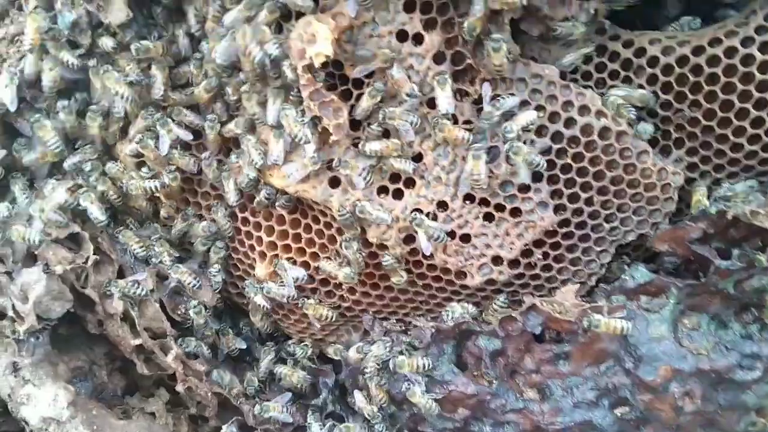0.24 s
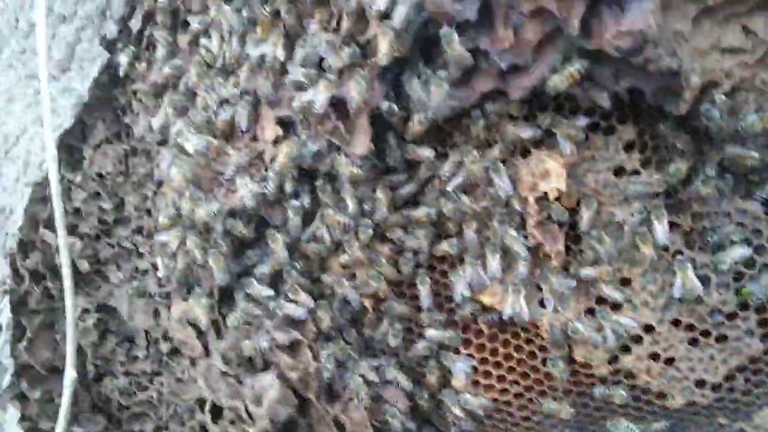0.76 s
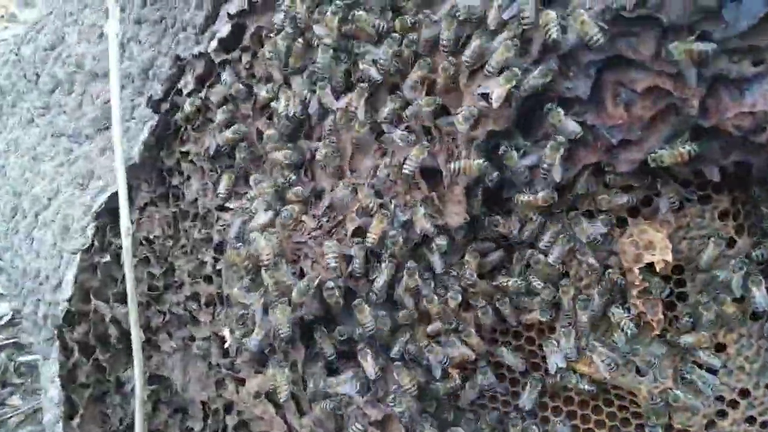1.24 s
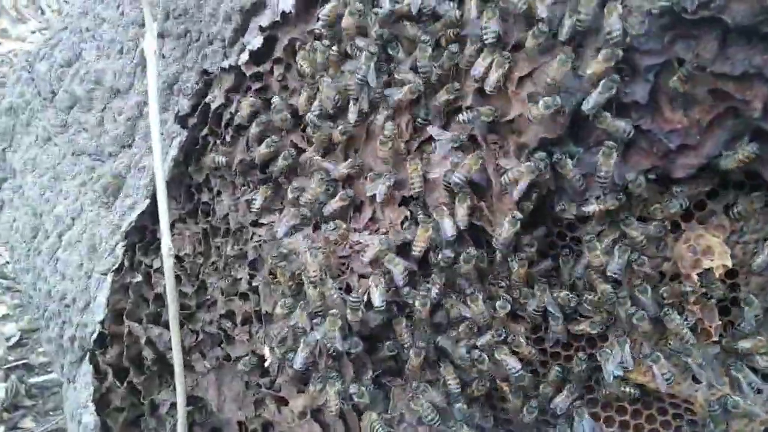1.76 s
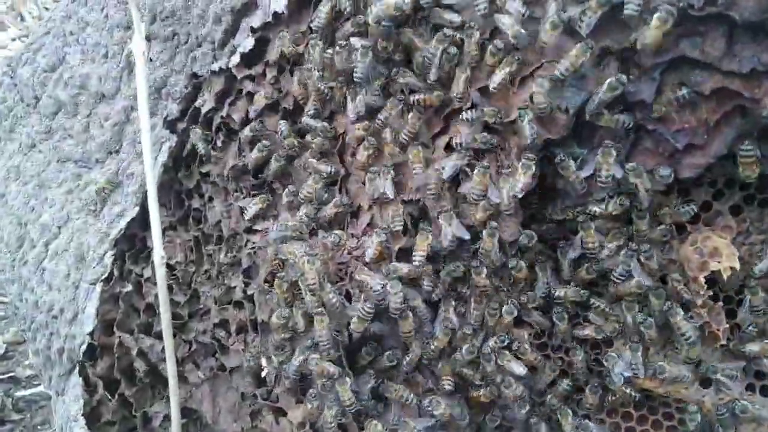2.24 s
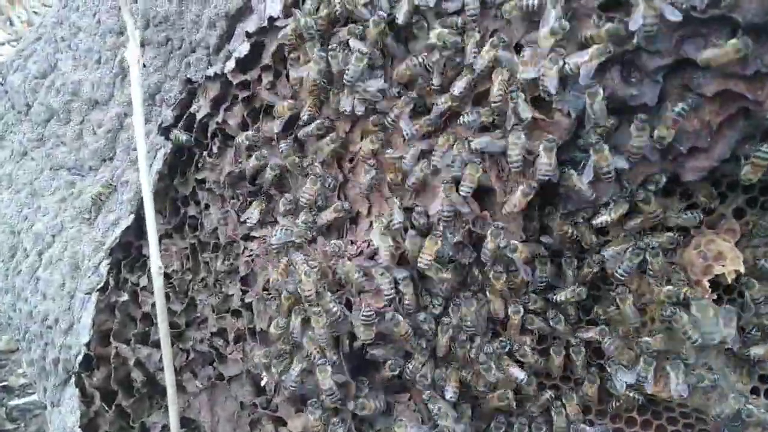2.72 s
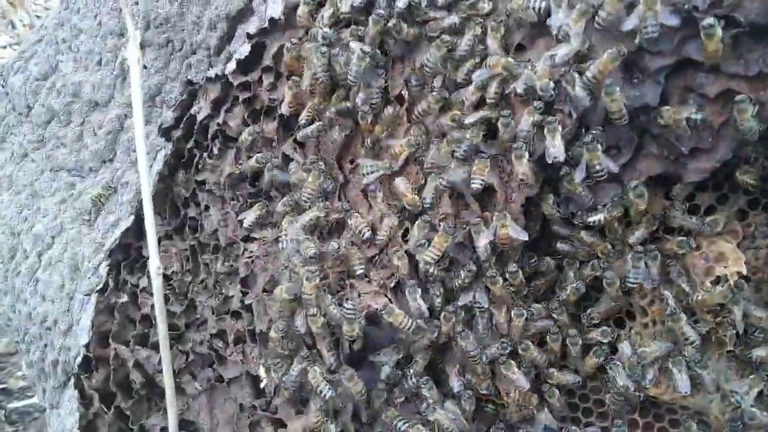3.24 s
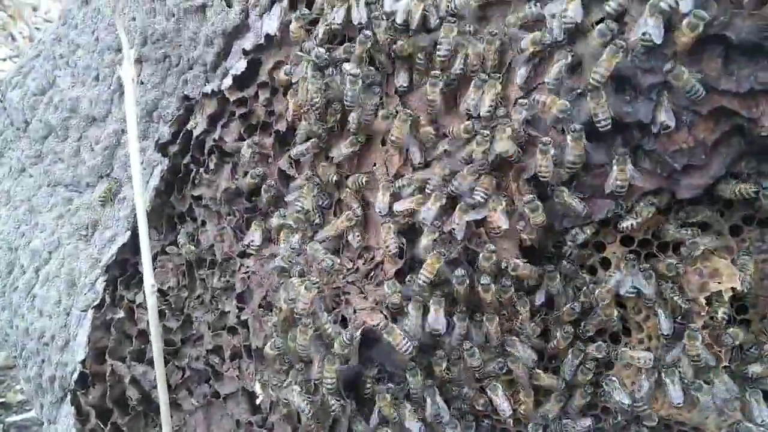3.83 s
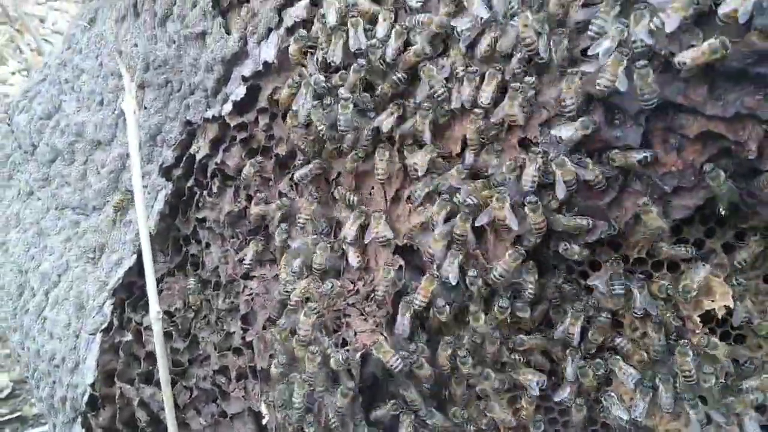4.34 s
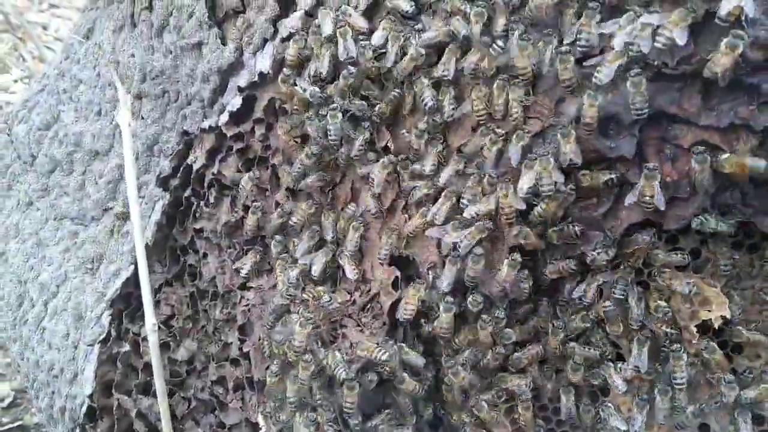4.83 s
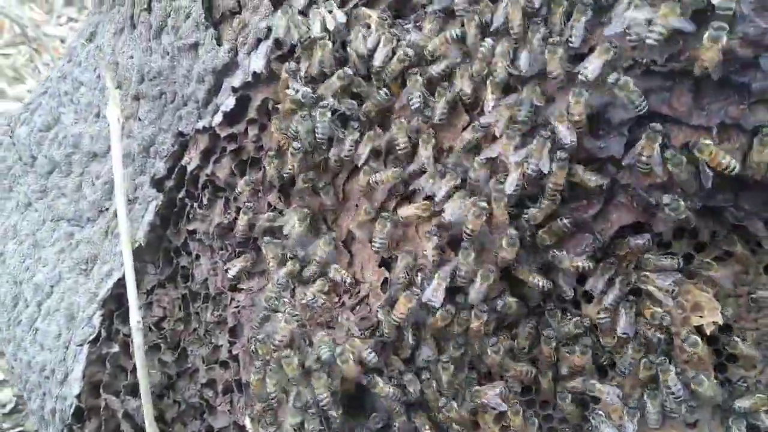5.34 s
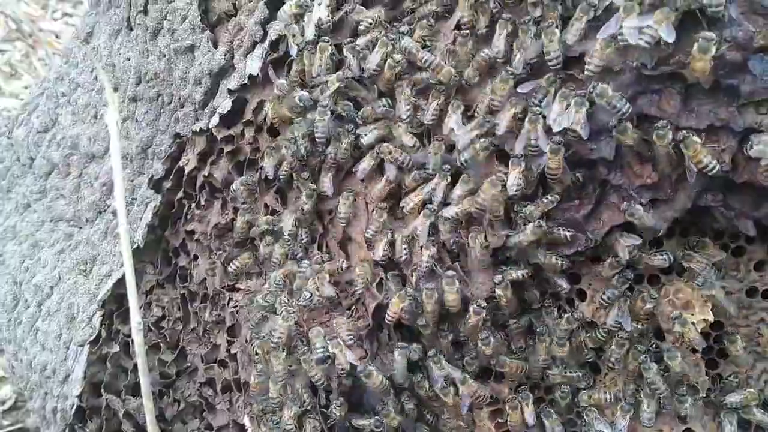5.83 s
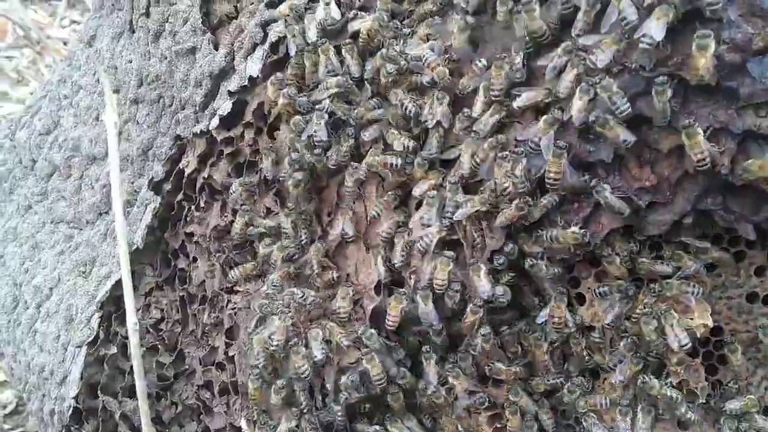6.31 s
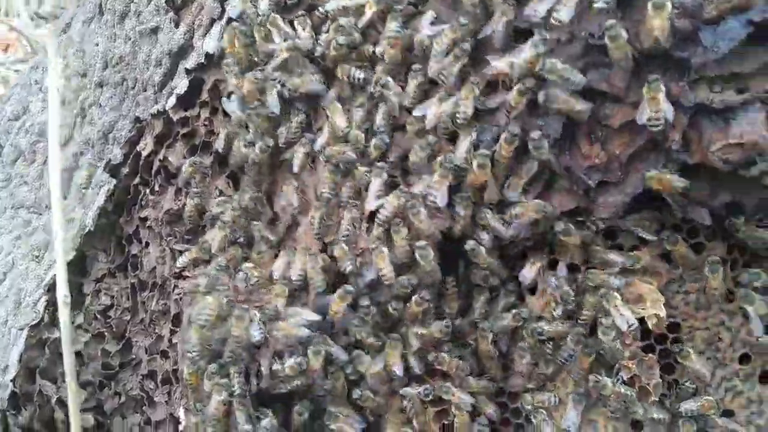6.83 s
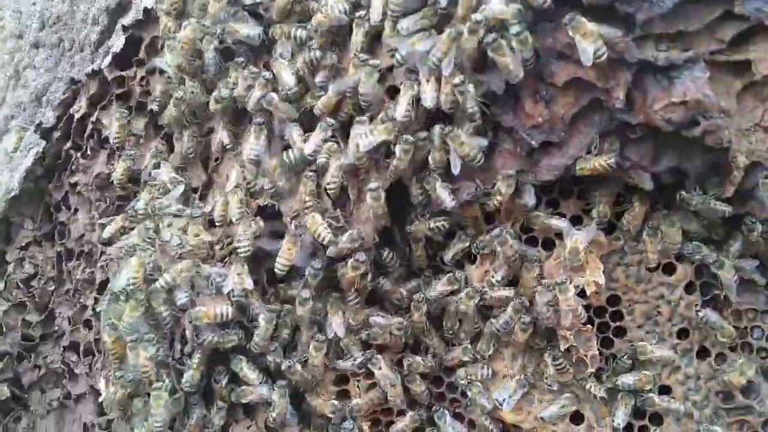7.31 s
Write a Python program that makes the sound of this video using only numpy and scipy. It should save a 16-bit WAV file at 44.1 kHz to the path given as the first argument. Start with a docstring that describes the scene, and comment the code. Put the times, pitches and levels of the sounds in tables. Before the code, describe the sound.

A close stereo microphone outdoors picks up a wild bee colony: a thick, throbbing drone with small dips and swells. Near fliers thicken the opening, then faster bees zip by at higher pitch. Faint chirping and thin hiss sit in the background, with a few dry ticks. Late on, gusts rumble and thump over the swarm while one bee hovers near.

```python
"""At an open comb outdoors, a wild honeybee colony hums close to a two-port microphone.
Each bee is a harmonic series on its wingbeat rate; dozens of them, drifting in pitch, make hum, buzz and rasp.
Fliers pass, single bees dart by, brief whines, a soft call and bent notes stand out, and one bee hovers near.
Filtered noise, low tones and pressure pulses make a breeze that flutters and slaps, harder towards the end.
Overlapping notes chirp faintly behind a soft noise hiss; bursts of band noise tick, rustle and crack."""
import sys
import numpy as np
from scipy import signal
from scipy.fft import rfft, irfft, next_fast_len
from scipy.io import wavfile
from scipy.ndimage import uniform_filter1d

SR = 44100
rng = np.random.default_rng(int(sys.argv[2]) if len(sys.argv) > 2 else 0)


def int16_out(signal):
    """Quantize to a 16-bit WAV file."""
    q = np.round(np.clip(np.atleast_2d(signal).T, -1, 1) * 32767)
    wavfile.write(sys.argv[1], SR, q.astype(np.int16))


N = 333837
T = np.arange(N) / SR
HZ = np.fft.rfftfreq(N, 1 / SR)
STEP = 8  # samples per step of the wingbeat synthesis

# Levels in the tables are relative: the functions trim and modulate them.
# Swell of the hum. Each row: time in seconds, level in dB.
HUM_LEVEL = [(0, -38), (.3, -40), (1.0, -41), (1.35, -43), (1.75, -41), (2.2, -42), (3.0, -38.5),
             (3.8, -39.5), (4.1, -37), (4.4, -42.5), (5.0, -43), (5.2, -47), (5.35, -37), (6.1, -40.5),
             (6.5, -41), (7.4, -37.5)]
# Swell of the upper harmonics. Each row: time in seconds, level in dB.
BUZZ_LEVEL = [(0, -38.5), (.5, -43), (1.1, -51), (1.7, -44.5), (2.0, -47.5), (2.9, -41.5), (3.7, -50.5),
              (4.1, -43), (4.45, -45), (5.3, -48.5), (5.7, -34.5), (5.85, -41), (6.5, -41.5), (7.5, -36.5)]
BUZZ_HZ, RASP_HZ = 580, 1000  # lower edges of the buzz and rasp registers
RASP_DB = -77.5  # rasp level before its modulation
WING_HZ, WING_SPREAD, WING_WANDER = 229.7, .028, .034  # mean wingbeat; shares of it between bees and over time
AGITATED_HZ = 264.1  # mean wingbeat of the agitated bees
# Spectrum radiated by the wings. Each row: frequency in Hz, gain in dB.
WING_SPECTRUM = [(150, 10.5), (230, -23), (310, -6.5), (400, 1.5), (460, -2), (560, 2.5), (610, 2),
                 (700, -1), (780, -3.5), (900, -27.5), (1030, -32), (1180, -42), (1350, -48.5),
                 (1700, -50.5), (2100, -52.5)]
# Stereo width of the swarm. Each row: frequency in Hz, gain of the side part in dB.
SWARM_WIDTH = [(230, 4), (330, -34), (450, -9.5), (700, -15), (900, -6.5), (1150, -34), (1500, 2.5),
               (2000, -12)]
# Stereo lean of the swarm. Each row: frequency in Hz, left minus right in dB.
SWARM_LEAN = [(230, 9.5), (450, 3), (740, 2.5), (1200, -0.5)]
# Agitated, faster bees. Each row: time in seconds, level against the calm bees in dB.
AGITATED_LEVEL = [(0, -29), (.6, -18.5), (1.0, -23.5), (2.5, -38), (2.9, -16.5), (4.2, -17), (5.2, -22.5),
                  (6.0, -14.5), (6.7, -30), (7.4, -16)]
# Stray bees that swoop about. Each row: time in seconds, level against the calm bees in dB.
STRAY_LEVEL = [(0, -1.5), (.6, -10), (1.1, -9), (1.5, -4), (2.1, -22.5), (2.8, -6), (3.4, -2), (3.7, -6.5),
               (4.15, -10.5), (4.8, -7), (5.7, -15), (6.5, -11), (7.5, -8)]
# The hovering bee. Each row: time in seconds, wingbeat in Hz, level against the swarm in dB.
HOVER_PATH = [(5.6, 257.1, -10.5), (5.95, 227.1, -9), (6.2, 220.4, -5), (6.4, 229, -7), (6.72, 237.9, -2),
              (7.03, 223.6, -3), (7.18, 244.4, -15.5), (7.4, 225.1, 1), (7.57, 232, 19.5)]
# The strongest throbs of the hum. Each row: centre in seconds, level in dB.
STRONG_THROBS = [(0.202, -28), (0.298, -24.5), (0.345, -25.5), (0.419, -29.5), (0.455, -26), (0.539, -29),
                 (0.649, -25), (0.79, -24.5), (0.926, -28.5), (0.978, -25), (1.11, -27.5), (1.223, -34),
                 (1.504, -29), (1.677, -30), (1.779, -31.5), (1.828, -30.5), (2.071, -31.5), (2.088, -27.5),
                 (2.598, -30), (2.751, -28.5), (2.827, -26), (2.886, -26.5), (2.953, -25.5), (2.987, -29),
                 (3.072, -28), (3.114, -35), (3.168, -23.5), (3.455, -31), (3.499, -26.5), (3.837, -34),
                 (3.925, -35), (4.036, -26), (4.125, -26), (4.145, -26.5), (4.305, -28.5), (4.62, -29),
                 (4.788, -27.5), (4.996, -28.5), (5.039, -33), (5.323, -27), (5.399, -27.5), (5.472, -23),
                 (5.509, -23), (5.685, -28.5), (6.165, -35.5), (6.624, -30), (6.917, -25.5), (7.02, -28),
                 (7.157, -37), (7.208, -25), (7.341, -34)]
THROB_S, THROB_DB = 0.0068, -4.5  # half-length of a throb; gain of the strong ones
SOFT_THROBS_PER_S, BETWEEN_DB = 24, -4  # mean rate of the soft throbs; the hum left between them
# Lulls, where the hum drops. Each row: centre in seconds, depth in dB.
LULL_DEPTH = [(.96, -13), (1.279, -12), (1.991, -16), (2.136, -25), (3.56, -10), (3.883, -11), (4.252, -13),
              (5.071, -24), (5.229, -6), (5.492, -16.5), (6.505, -13)]
LULL_S = 0.018  # half-length of a lull
# Fliers close by. Each row: start in seconds, length in seconds, level in dB, wingbeat from Hz, to Hz.
FLIER_PASSES = [(0, .12, -39.5, 229, 234.7), (0.194, 0.083, -44, 238, 230),
                (0.332, 0.053, -42.5, 234, 236.8), (0.448, 0.087, -41.5, 242, 235.3),
                (0.629, 0.044, -44.5, 240, 226), (0.74, 0.022, -51, 233, 231.4),
                (1.496, 0.017, -57, 254, 248.3), (1.796, 0.018, -54, 226, 223),
                (2.334, 0.029, -54, 219, 220.6), (2.548, 0.035, -54.5, 238, 243.4),
                (4.054, 0.043, -51, 226, 231.5), (4.29, 0.026, -61.5, 232, 226), (4.53, .03, -61, 250, 258),
                (4.974, 0.039, -61.5, 233, 239.5), (5.877, 0.18, -55, 232, 224.2),
                (7.142, 0.48, -48, 244, 221.6)]
PASS_RISE_S, PASS_FADE_S = 0.021, 0.039
FLIER_HZ = 234.9  # mean wingbeat of the leader's company
# Spectrum radiated by a close flier. Each row: frequency in Hz, gain in dB.
FLIER_SPECTRUM = [(150, -10.5), (235, -3), (330, 7.5), (470, 3), (700, 3), (830, 9.5), (930, -6.5),
                  (1030, -6.5), (1190, -0.5), (1350, -16), (1600, -20.5), (2100, -41)]
# Bees that dart by. Each row: start in seconds, length in seconds, level in dB, wingbeat from Hz, to Hz.
DART_FLIGHTS = [(0, .8, -47.5, 303, 287), (2.7, 0.45, -49, 303, 275.6), (3.1, 0.56, -46, 261.5, 298.8),
                (3.68, .16, -52, 322, 327), (4.0, .36, -46, 346.6, 299.7), (5.301, 0.45, -45.5, 294, 276.5)]
# Spectrum radiated by a darting bee. Each row: frequency in Hz, gain in dB.
DART_SPECTRUM = [(280, -17.5), (560, 0.5), (680, 0), (860, -22), (1200, -29.5), (2000, -48)]
# The breeze between the gusts. Each row: time in seconds, level in dB.
BREEZE_LEVEL = [(0, -67), (2.4, -60.5), (3.6, -65.5), (5.15, -69.5), (6.1, -41), (6.55, -65), (7.2, -53.5),
                (7.5, -37.5)]
# Gusts that hit the ports. Each row: start in seconds, length in seconds, level in dB.
PORT_GUSTS = [(0.636, 0.016, -35), (0.788, 0.032, -32), (.89, 0.017, -35.5), (1.501, 0.059, -34.5),
              (1.659, 0.057, -28), (2.232, 0.052, -38), (2.364, 0.057, -36), (2.459, 0.043, -39),
              (2.744, 0.042, -36.5), (2.874, 0.03, -30), (3.832, 0.013, -38), (4.086, 0.024, -36.5),
              (4.292, 0.045, -29.5), (4.52, 0.14, -41.5), (5.335, 0.032, -26), (5.438, 0.023, -26.5),
              (5.541, 0.079, -28.5), (5.635, 0.036, -19), (5.721, 0.031, -22), (5.772, 0.11, -31.5),
              (5.896, 0.061, -20), (5.972, 0.031, -19.5), (6.03, 0.04, -25.5), (6.104, 0.016, -30),
              (6.201, 0.042, -18), (6.25, 0.039, -22), (6.383, 0.1, -33.5), (6.617, 0.055, -31),
              (6.741, 0.017, -24), (6.807, 0.025, -32.5), (6.928, 0.056, -23), (7.016, 0.027, -21),
              (7.204, 0.0092, -21.5), (7.297, 0.056, -17.5), (7.38, 0.037, -19.5), (7.424, 0.034, -23.5),
              (7.516, 0.018, -18.5), (7.553, .02, -28)]
GUST_RISE_S, GUST_FADE_S = .008, 0.012
# Buffeting by an eddy centred at EDDY_HZ. Each row: frequency in Hz, gain in dB.
BUFFET_SPECTRUM = [(20, -15.5), (50, -22), (78, 6), (105, 6.5), (140, 0), (200, -5.5), (300, -17.5),
                   (420, -17), (700, -48), (1200, -72), (2500, -87.5), (8000, -105)]
EDDY_HZ, EDDY_DB, DB_PER_OCTAVE = 128, -24, 96  # a gust of EDDY_DB is centred at EDDY_HZ; stronger is higher
# Common push of the air on both ports. Each row: frequency in Hz, gain of the mid part in dB.
COMMON_PUSH = [(30, -15.5), (70, -15.5), (110, -18.5), (200, -5), (330, -4), (600, 11.5)]
SHED_HZ, SHED_SHARE, SHED_WAVER = 107.3, 0.63, .12  # rate at EDDY_DB; share of gust power; unevenness
# Outdoor and microphone hiss. Each row: frequency in Hz, density in dB per Hz.
HISS_SPECTRUM = [(20, -104), (150, -87.5), (600, -99), (1200, -105), (2000, -104), (3300, -105),
                 (4500, -108), (5600, -109), (7000, -111), (10000, -113), (13000, -116.5), (15000, -117)]
# Likeness of the hiss at the ports. Each row: frequency in Hz, left-right correlation from 0 to 1.
HISS_LIKENESS = [(100, 0.63), (1200, 0.98), (1750, 0.97), (2300, 1), (2900, 0.88), (3400, 0.52),
                 (4700, 0.82), (5600, 0.36), (15000, 0.19)]
PORT_DELAY_S, IN_STEP_HZ = .00044, 1150  # delay of the right port; the ports stay in step below this
# Bouts of faint chirping. Each row: start in seconds, length in seconds, level in dB, pitch from Hz, to Hz.
CHIRP_BOUTS = [(1.003, 0.073, -71, 3980, 4070), (1.525, 0.027, -68, 3900, 3800),
               (2.382, 0.017, -60, 4150, 4060), (2.429, 0.11, -63.5, 3910, 3910),
               (2.749, 0.063, -63.5, 3730, 3920), (2.821, .02, -66, 3660, 3620),
               (2.943, 0.028, -64, 3980, 3950), (3.007, .02, -70, 3700, 3680), (3.11, .15, -66, 3930, 3880),
               (3.408, 0.094, -63.5, 3580, 3990), (3.61, .12, -63.5, 3970, 3850),
               (3.896, 0.1, -64.5, 3770, 3930), (4.022, .11, -59.5, 3930, 3710),
               (4.04, 0.051, -65, 2800, 2860), (4.247, .06, -65.5, 3830, 3960),
               (4.422, 0.043, -63.5, 3800, 3860), (4.536, 0.016, -66, 3930, 3960),
               (4.63, 0.052, -65.5, 3690, 3820), (4.98, 0.021, -64, 3810, 3790),
               (5.095, .11, -65.5, 3770, 3950), (5.384, 0.11, -62, 3910, 3830),
               (5.61, 0.02, -60.5, 3730, 3830), (5.735, 0.045, -67, 3900, 3960),
               (5.85, 0.016, -64.5, 3920, 3850), (5.932, 0.086, -62.5, 3800, 3950),
               (6.097, 0.1, -59.5, 3900, 3680), (6.423, 0.058, -68, 3790, 3840),
               (6.565, 0.052, -58.5, 3920, 3900), (6.666, 0.11, -73, 2890, 2990),
               (7.041, 0.047, -67, 3980, 3680), (7.2, 0.043, -64, 3400, 3520),
               (7.288, 0.068, -67, 4260, 4020)]
CHIRP_RISE_S, CHIRP_FADE_S, FAR_CHIRPS_DB = 0.0066, 0.035, -79.5
# Brief whines that stand out of the buzz, and one soft high call.
# Each row: centre in seconds, level in dB, length in seconds, mean pitch in Hz.
BRIEF_WHINES = [(0.062, -50, 0.11, 876), (.5, -53.5, 0.15, 1192), (.44, -64, 0.085, 1620),
                (0.627, -59.5, 0.098, 1410), (0.797, -60, 0.08, 1536), (1.518, -46.5, 0.1, 743),
                (1.721, -53, 0.17, 888), (2.018, -57.5, 0.13, 883), (2.231, -51, 0.22, 880),
                (2.404, -51, 0.27, 890), (2.57, -68, .12, 1210), (2.744, -63, .1, 980),
                (3.285, -59.5, 0.11, 930), (3.493, -58, 0.084, 890), (4.309, -58.5, 0.092, 913),
                (4.537, -55.5, .13, 1006), (4.704, -65, 0.18, 1070), (5.039, -64, 0.088, 1180),
                (5.66, -52, 0.16, 828), (5.73, -43.5, .16, 735), (6.099, -65, 0.095, 3110),
                (7.06, -54, 0.14, 830), (7.159, -50.5, 0.11, 1142), (7.351, -54, .12, 1063)]
# Slaps of air. Each row: centre in seconds, level in dB, pulse frequency in Hz.
AIR_SLAPS = [(0.686, -11.5, 230), (1.675, -24, 130), (2.888, -32, 160), (4.303, -21, 170),
             (5.644, -19, 180), (5.727, -23, 188), (5.914, -10.5, 130), (5.932, -20, 140), (5.984, -8, 170),
             (6.038, -7.5, 250), (6.228, -7, 131), (6.289, -14, 160), (6.97, -17, 190), (7.039, -19, 190),
             (7.311, -18, 160), (7.345, -7, 225), (7.388, -5, 202), (7.525, -9.5, 190)]
# Ticks, rustles and wind cracks. Each row: start in seconds, peak level in dB, centre in Hz,
# width in octaves, time of the ring to decay by 60 dB in seconds, rise in seconds.
TICK_BURSTS = [(1.165, -50, 8500, 0.45, .025, 0.0015), (1.318, -47.5, 11000, 0.65, .035, .001),
               (1.321, -57.5, 2160, 0.19, 0.056, .002), (1.337, -50, 12000, .8, .035, .002),
               (1.666, -41, 5020, 0.08, 0.14, 0.0005), (2.35, -63, 10200, 0.08, 0.16, 0.016),
               (4.01, -59, 9750, 0.072, 0.39, 0.0087), (5.178, -60, 13900, .15, 0.12, .005),
               (6.009, -47.5, 11400, 0.18, 0.23, 0.00063), (6.011, -51, 8000, .8, .01, .0003),
               (6.226, -38.5, 850, 0.8, 0.02, 0.00059), (6.227, -55, 3400, .35, .015, .0005),
               (7.29, -60.5, 4920, 0.052, 0.19, 0.0038), (7.365, -61, 6860, .025, 0.17, .003),
               (7.343, -51, 1050, .75, .012, .0005), (7.522, -46, 1000, 0.8, 0.015, .0005)]
SNAP_S = .002  # decay constant of the quick part of a burst
CUT_HZ = 15350  # upper band limit of the recorder


def amp(db):
    """Logarithmic levels: decibels become an amplitude ratio."""
    return 10 ** (np.asarray(db) / 20)


def unit(x):
    """Normalisation: scales a signal to rms 1."""
    return x / np.sqrt(np.mean(x ** 2) + 1e-20)


def read(points, hz):
    """Log-frequency interpolation of a spectrum table."""
    f, value = np.transpose(points)
    return np.interp(np.log(hz + 1), np.log(f + 1), value)


def curve(rows, t, axis=1):
    """Linear interpolation of one column of a time table at the times t."""
    rows = np.asarray(rows)
    return np.interp(t, rows[:, 0], rows[:, axis])


def colour(x, gain):
    """Linear filtering: multiplies the spectrum by a gain per frequency."""
    return irfft(rfft(x) * gain, x.shape[-1])


def add(mix, s, sound):
    """Superposition: adds a sound to the mix from time s."""
    part = mix[..., max(round(s * SR), 0):][..., :sound.shape[-1]]
    part += sound[..., :part.shape[-1]]


def drift(t, per_s):
    """Low-pass noise: smooth random motion of rms 1."""
    f = np.fft.rfftfreq(len(t), t[1])
    gain = (f > 0) / (1 + (f / per_s) ** 2) / (1 + (f / 60) ** 4)
    return unit(colour(rng.standard_normal(len(t)), gain))


def loudness(x, size):
    """Short-time power: running rms over about size samples."""
    power = uniform_filter1d(uniform_filter1d(x ** 2, size), size)
    return np.sqrt(abs(power) + 1e-14)


def ports(mid, side):
    """Sum and difference: left and right from the common and the opposed part."""
    return np.array([mid + side, mid - side])


def lean(lean_db):
    """Level difference: gains that set left above right by lean_db."""
    return amp([[lean_db / 2], [-lean_db / 2]])


def glide(start, length, from_hz, to_hz, t):
    """Linear glide: a pitch that slides in a straight line."""
    return np.interp(t, [start, start + length], [from_hz, to_hz])


def swell(start, length, rise_s, fade_s, t=T):
    """Exponential envelope: a gain that rises to 1 at start, holds for length and fades."""
    return np.exp(np.minimum(t - start, 0) / rise_s - np.maximum(t - start - length, 0) / fade_s)


def coarse_times():
    """Reduced sampling: the times of the wingbeat synthesis."""
    return np.arange(next_fast_len(N // STEP + 1)) * STEP / SR


def full_rate(bees):
    """Band-limited interpolation: brings wingbeats to the full sample rate."""
    return signal.resample_poly(bees, STEP, 1, axis=-1)[..., :N]


def wingbeat(hz, count=8):
    """Periodic motion of the wings: one bee as a stack of harmonics on its wingbeat rate."""
    turn = np.exp(2j * np.pi * np.cumsum(hz) * STEP / SR)
    stack = 0
    for phase in rng.random(count):
        stack = (stack + np.exp(2j * np.pi * phase)) * turn
    return stack.real


def crowd(t, mean_hz, count, wander=WING_WANDER, wander_per_s=1.6, flutter=0.00826, come_and_go_db=3.0):
    """Beats between near frequencies: bees of wandering pitch, level and direction, as mid and side."""
    mid, side = np.zeros((2, len(t)))
    rank = (np.arange(count) + .5) / count
    for odd in unit(np.log(rank / (1 - rank))):  # most beat near the mean, a few far off
        hz = mean_hz * (1 + WING_SPREAD * odd + wander * drift(t, wander_per_s) + flutter * drift(t, 26.7))
        bee = unit(wingbeat(hz) * amp(come_and_go_db * drift(t, 14.0)))
        mid += bee
        side += bee * drift(t, 0.47)
    return np.array([unit(mid), unit(side)])


def swarm(hover_db=3.0, hover_waver=0.00414, stray_hz=245, stray_wander=.075, stray_come_and_go_db=3):
    """Superposition of calm, agitated, stray and hovering bees, the last straight ahead; mid and side."""
    t = coarse_times()
    calm = crowd(t, WING_HZ, count=16)
    agitated = crowd(t, AGITATED_HZ, count=8) * amp(curve(AGITATED_LEVEL, t))
    strays = crowd(t, stray_hz, count=6, wander=stray_wander, wander_per_s=3,
                   come_and_go_db=stray_come_and_go_db) * amp(curve(STRAY_LEVEL, t))
    bees = calm + agitated + strays
    hover = unit(wingbeat(curve(HOVER_PATH, t) * (1 + hover_waver * drift(t, 13.6))))
    hover_gain = amp(curve(HOVER_PATH, t, axis=2) + hover_db) * (t > HOVER_PATH[0][0])
    bees[0] += hover * hover_gain
    return full_rate(bees) * signal.windows.tukey(N, .003)


def throbs():
    """Amplitude modulation by strong and soft Gaussian throbs of the whole swarm, in dB."""
    waits = rng.gamma(4, 1 / 4, 250)
    soft, strong = np.zeros((2, N))
    t = np.arange(-SR // 20, SR // 20) / SR
    bead = np.exp(-(t / THROB_S) ** 2)
    for s in np.cumsum(waits) / SOFT_THROBS_PER_S:
        add(soft, s, bead)
    for s, db in STRONG_THROBS:
        add(strong, s + t[0], bead * amp(db + THROB_DB - curve(HUM_LEVEL, s)))
    return 20 * np.log10(np.hypot(unit(soft + amp(BETWEEN_DB)), strong))


def lulls():
    """Amplitude modulation by Gaussian dips: the drop of the hum at each moment, in dB."""
    return sum(db * np.exp(-((T - s) / LULL_S) ** 2) for s, db in LULL_DEPTH)


def colony(hum_db=-0.5, buzz_db=-6.0, hum_flutter_db=1, buzz_flutter_db=3.0, rasp_flutter_db=3,
           fits_per_s=60, surge_db=1.92, surges_per_s=12, buzz_follow=0.38, rasp_follow=1.0):
    """Band-wise modulation of a harmonic source: the swarm's hum, buzz and rasp swell as bees turn and crowd."""
    mid, side = colour(swarm(), amp(read(WING_SPECTRUM, HZ)))
    lean_share = np.tanh(read(SWARM_LEAN, HZ) * np.log(10) / 40)  # side part that yields the lean in dB
    side = colour(side, amp(read(SWARM_WIDTH, HZ))) + colour(mid, lean_share)
    below_buzz, below_rasp = (1 / (1 + (HZ / edge) ** 24) for edge in (BUZZ_HZ, RASP_HZ))
    effort = drift(T, fits_per_s)  # wings whirr in short fits
    surge = throbs() + surge_db * drift(T, surges_per_s) + lulls()
    hum = curve(HUM_LEVEL, T) + hum_db + surge + hum_flutter_db * effort
    buzz = curve(BUZZ_LEVEL, T) + buzz_db + buzz_follow * surge + buzz_flutter_db * effort
    rasp = RASP_DB + rasp_follow * surge + rasp_flutter_db * effort
    out = 0
    for band, db in [(below_buzz, hum), (below_rasp - below_buzz, buzz), (1 - below_rasp, rasp)]:
        pair = colour(ports(mid, side), band)
        out = out + pair * amp(db) / loudness(pair.mean(0), size=720)  # quick beats between bees remain
    return out


def fliers(level_db=-1, company_db=-1.5, waver=.011, flutter_db=2.5, flutter_per_s=40,
           wide_db=-14, wide_below_hz=300, lean_db=2):
    """Harmonic radiation at close range: in each pass one bee leads on a sliding pitch among a few others."""
    t = coarse_times()
    lead, near = np.zeros((2, len(t)))
    for s, length, db, from_hz, to_hz in FLIER_PASSES:
        gain = amp(db) * swell(s, length, PASS_RISE_S, PASS_FADE_S, t)
        hz = glide(s, length, from_hz, to_hz, t) * (1 + waver * drift(t, 14.63))
        lead += gain * unit(wingbeat(hz))
        near += gain
    company = crowd(t, FLIER_HZ, count=9, wander=.06, wander_per_s=5, flutter=0.01633)
    bees = company * near * amp(company_db)
    bees[0] += lead
    mid, side = colour(full_rate(bees), amp(read(FLIER_SPECTRUM, HZ)))
    low = 1 / (1 + (HZ / wide_below_hz) ** 8)  # only the lows are wide
    pair = ports(mid, colour(side, amp(wide_db) + low))
    return pair * amp(level_db + flutter_db * drift(T, flutter_per_s)) * lean(lean_db)


def darts(level_db=-1, waver=0.01622, wavers_per_s=12, flutter_db=3.5, lean_db=2.5):
    """Gliding harmonic series under a half-sine envelope: single fast bees swell, slide in pitch and fade."""
    t = coarse_times()
    bees = np.zeros(len(t))
    for s, length, db, from_hz, to_hz in DART_FLIGHTS:
        arch = np.sin(np.pi * np.clip((t - s) / length, 0, 1))
        hz = glide(s, length, from_hz, to_hz, t) * (1 + waver * drift(t, wavers_per_s))
        bees += wingbeat(hz) * arch * amp(db + level_db + flutter_db * drift(t, 25))
    return colour(full_rate(bees), amp(read(DART_SPECTRUM, HZ))) * lean(lean_db)


def flecks(count=24, low_hz=900, high_hz=1450, length=0.046, per_s=26, level_db=-73, bend=0.039):
    """Random succession of tone bursts: bees on the comb whirr their wings in short bent notes above the hum."""
    u = np.linspace(-1, 1, int(length * SR))
    out = np.zeros(N)
    for hz, slide in zip(np.geomspace(low_hz, high_hz, count), rng.standard_normal(count)):
        phase = 2 * np.pi * np.cumsum(hz * (1 + bend * slide * u)) / SR
        note = np.hanning(len(u)) * np.sin(phase) / hz ** 2
        onsets = 1.0 * (rng.random(N) < per_s / count / SR)
        out += signal.oaconvolve(onsets, note, "same")
    return np.array([unit(out), unit(out)]) * amp(level_db)


def turbulence(size, centre_hz, bass_cut_hz=72, lean_db=0.83):
    """Turbulent pressure noise, mostly opposed on the ports: small quick eddies sound higher."""
    hz = np.fft.rfftfreq(size, 1 / SR)
    bass_cut = amp(-19.5) + hz ** 4 / (hz ** 4 + bass_cut_hz ** 4)  # the microphone sheds deep bass
    spectrum = amp(read(BUFFET_SPECTRUM, hz * EDDY_HZ / centre_hz))
    mid, side = colour(rng.standard_normal((2, size)), bass_cut * spectrum)
    return ports(colour(mid, amp(read(COMMON_PUSH, hz))), side) * lean(lean_db)


def shedding(size, rate_hz, overtone_db=-14, common_db=-19):
    """Vortex shedding: a near-regular train of eddies opposes the ports in a low, uneven flutter tone."""
    hz = rate_hz * (1 + SHED_WAVER * drift(T[:size], 40))
    turn = 2 * np.pi * (np.cumsum(hz) / SR + rng.random())
    tone = unit(np.sin(turn) + amp(overtone_db) * np.sin(2 * turn))
    return ports(tone * amp(common_db), tone)


def wind(breeze_db=11.0, lumpy_db=4, eddies_db=2.5, eddies_per_s=30):
    """Flow noise: a lumpy breeze with gusts on top, each part turbulence and part regular flutter."""
    breeze_level = curve(BREEZE_LEVEL, T) + breeze_db + lumpy_db * drift(T, 21)
    out = unit(turbulence(N, EDDY_HZ * 1.18)) * amp(breeze_level)
    eddies = amp(eddies_db * drift(T, eddies_per_s))
    for s, length, db in PORT_GUSTS:
        span = (T > s - 5 * GUST_RISE_S) & (T < s + length + 5 * GUST_FADE_S)
        shape = swell(s, length, GUST_RISE_S, GUST_FADE_S, T[span])
        speed = 2 ** ((db - EDDY_DB) / DB_PER_OCTAVE)
        rough = unit(turbulence(size=16384, centre_hz=EDDY_HZ * speed))
        regular = shedding(size=16384, rate_hz=SHED_HZ * speed)
        air = np.sqrt(1 - SHED_SHARE) * rough + np.sqrt(SHED_SHARE) * regular
        gust = unit(air[:, :len(shape)] * eddies[span] * shape)
        out[:, span] += gust * np.sqrt(np.mean(shape ** 2)) * amp(db)
    return out


def from_left(pair):
    """Difference in arrival time: treble from the surroundings reaches the left port first."""
    lag = np.exp(-2j * np.pi * np.maximum(HZ - IN_STEP_HZ, 0) * PORT_DELAY_S)
    return np.array([pair[0], colour(pair[1], lag)])


def hiss(patchy_db=1.0):
    """Partly correlated noise: a soft air and microphone hiss whose level flickers slightly."""
    shared, private = rng.standard_normal((2, N)) * np.sqrt(SR / 2)
    same = read(HISS_LIKENESS, HZ)
    right = colour(shared, same) + colour(private, np.sqrt(1 - same ** 2))
    pair = colour(np.array([shared, right]), amp(read(HISS_SPECTRUM, HZ)))
    return from_left(pair) * amp(patchy_db * drift(T, per_s=30))


def chirps(count=30, pitch_hz=3890, spread_hz=80, glide_hz=70, length=.034, per_s=420,
           low_share=0.3, low_hz=480, low_db=-12, level_db=-1):
    """Frequency shifting of overlapping notes, some low and soft: a faint bed, and bouts on sliding pitches."""
    u = np.linspace(-1, 1, int(length * SR))
    notes = np.zeros(N, complex)  # pitches are offsets from a carrier
    for k, (offset, bend, fall) in enumerate(rng.standard_normal((count, 3))):
        low = k < low_share * count
        off_hz = spread_hz * offset + glide_hz * bend * u - low * low_hz * (1 + 0.45 * fall)
        note = np.hanning(len(u)) * np.exp(2j * np.pi * np.cumsum(off_hz) / SR) * amp(low * low_db)
        onsets = (rng.random(N) < per_s / count / SR) * rng.standard_normal(N)
        notes += signal.oaconvolve(onsets, note, "same")
    notes /= loudness(notes.real, size=1600) + 0.032 * notes.real.std()
    out = (notes * np.exp(2j * np.pi * pitch_hz * T)).real * amp(FAR_CHIRPS_DB)
    for s, hold, db, from_hz, to_hz in CHIRP_BOUTS:
        span = (T > s - 5 * CHIRP_RISE_S) & (T < s + hold + 5 * CHIRP_FADE_S)
        turn = np.exp(2j * np.pi * np.cumsum(glide(s, hold, from_hz, to_hz, T[span])) / SR)
        shape = swell(s, hold, CHIRP_RISE_S, CHIRP_FADE_S, T[span])
        out[span] += (notes[span] * turn).real * shape * amp(db + level_db)
    return from_left([out, out])


def whines(count=4, waver=0.0267, wavers_per_s=22):
    """Interference of near frequencies: each whine or call is a few wavering partials that beat together."""
    out = np.zeros(N)
    for s, db, length, hz in BRIEF_WHINES:
        window = np.hanning(int(length * SR))
        pitches = [hz * (1 + waver * drift(T[:32768], wavers_per_s)[:len(window)]) for _ in range(count)]
        turns = np.cumsum(pitches, 1) / SR + rng.random((count, 1))
        tone = np.sin(2 * np.pi * turns).sum(0)
        add(out, s - len(window) / SR / 2, unit(tone) * window * amp(db))
    return np.array([out, out])


def slaps(level_db=-0.5, common_db=-13, bass_cut_hz=85):
    """Impulsive pressure: each slap is one quick dip, mostly opposed on the two ports."""
    out, t = np.zeros(N), np.arange(-SR // 50, SR // 50) / SR
    for s, db, hz in AIR_SLAPS:
        u = (np.pi * hz * t) ** 2
        dip = (2 * u - 1) * np.exp(-u)
        add(out, s + t[0], dip * amp(db + level_db))
    out = colour(out, HZ ** 4 / (HZ ** 4 + bass_cut_hz ** 4))
    return ports(out * amp(common_db), out)


def ticks(level_db=1, snap_db=7):
    """Exponential decay: ticks, rustles and wind cracks as short bursts of band noise, some sharp and some soft."""
    out, t = np.zeros((2, N)), np.arange(SR // 4) / SR
    f = np.fft.rfftfreq(len(t), 1 / SR) + 1
    for s, db, hz, octaves, t60, rise in TICK_BURSTS:
        noise = colour(rng.standard_normal((2, len(t))), 1 / (1 + (np.log2(f / hz) / octaves) ** 4))
        ring = np.exp(-np.log(1000) * t / t60)
        snap = amp(snap_db) * np.exp(-t / SNAP_S)
        burst = noise * (1 - np.exp(-t / rise)) * (ring + snap)
        add(out, s, burst / abs(burst).max() * amp(db + level_db))
    return out


def scene():
    """Superposition of the colony, the wind on the ports and the faint surroundings."""
    bees = colony() + fliers() + darts() + flecks() + whines()
    return bees + wind() + slaps() + hiss() + chirps() + ticks()


def record(dry):
    """Band limitation: the recorder's low-pass, with a soft start and end."""
    lowpass = signal.firwin(511, CUT_HZ, window=("kaiser", 9), fs=SR)
    faded = dry * signal.windows.tukey(N, .002)
    return signal.oaconvolve(faded, lowpass[None], "same")


dry = scene()
out = record(dry)
int16_out(out)
```